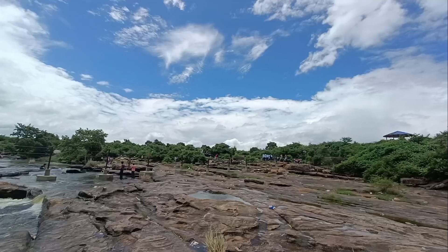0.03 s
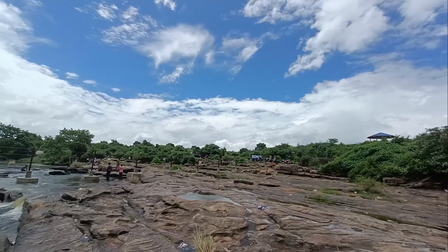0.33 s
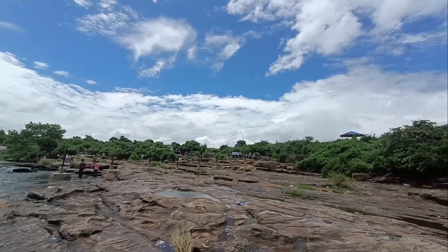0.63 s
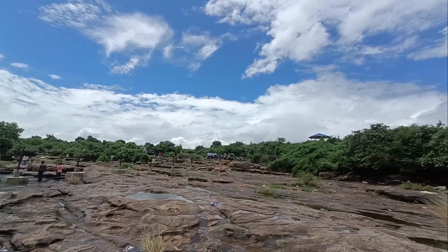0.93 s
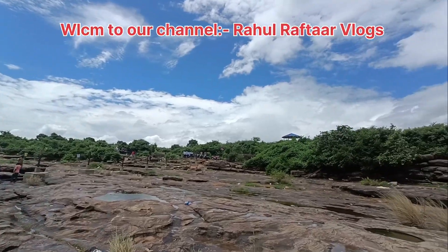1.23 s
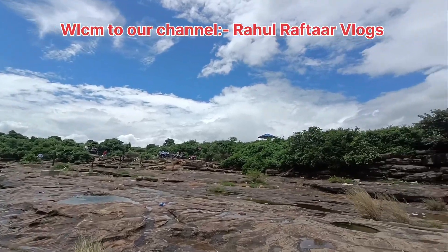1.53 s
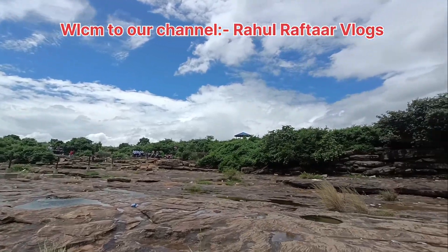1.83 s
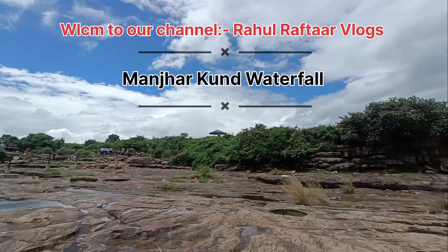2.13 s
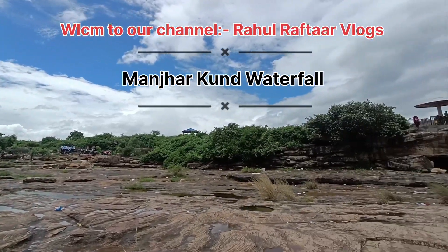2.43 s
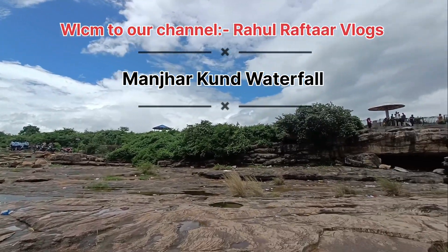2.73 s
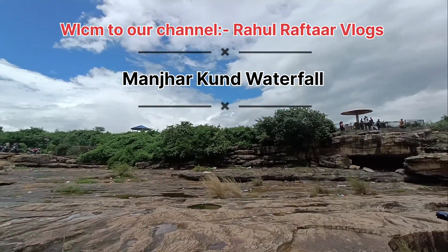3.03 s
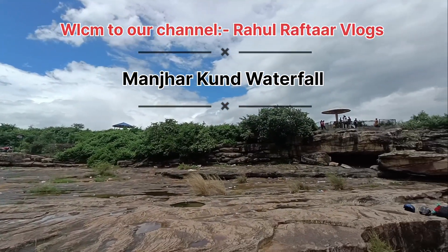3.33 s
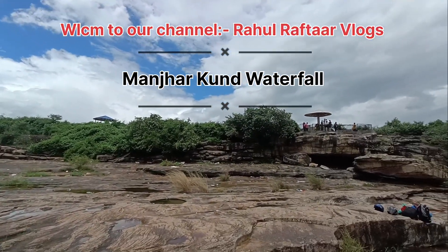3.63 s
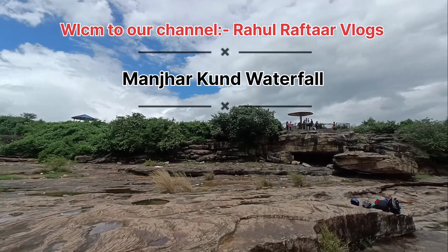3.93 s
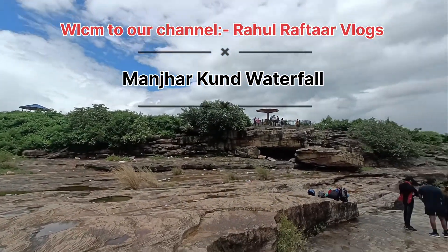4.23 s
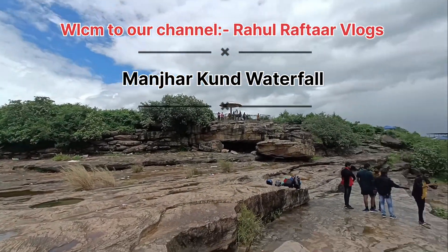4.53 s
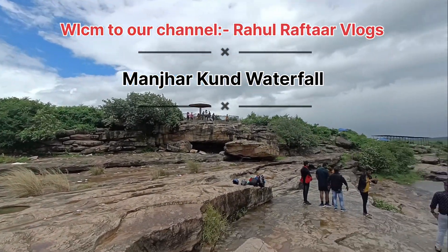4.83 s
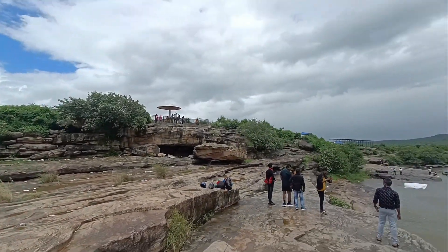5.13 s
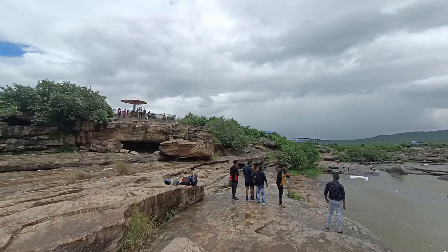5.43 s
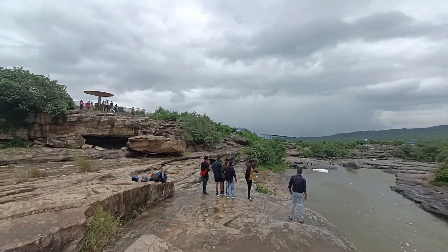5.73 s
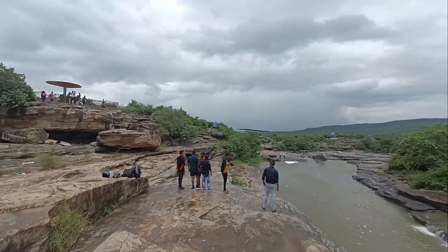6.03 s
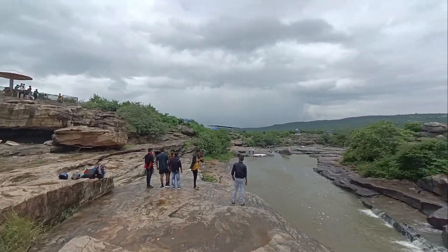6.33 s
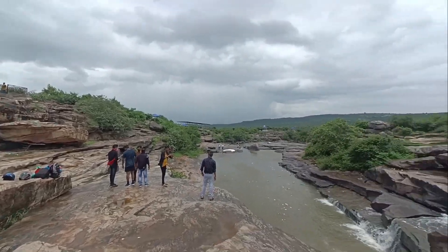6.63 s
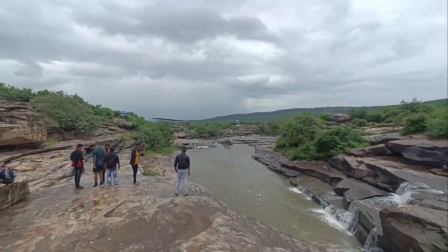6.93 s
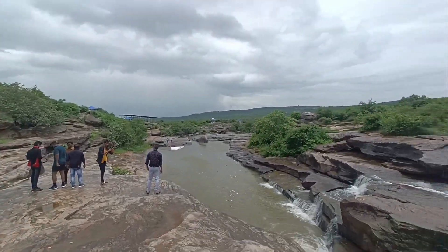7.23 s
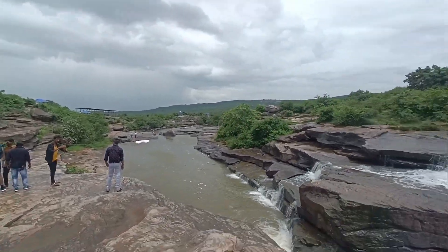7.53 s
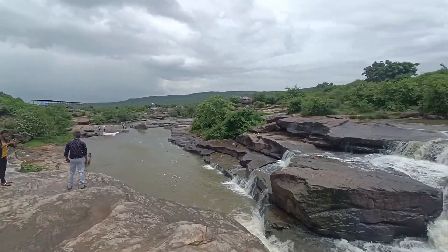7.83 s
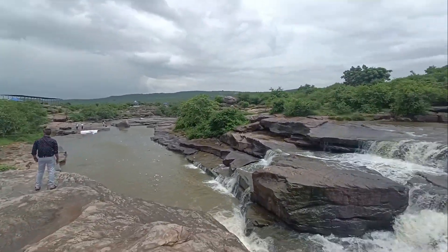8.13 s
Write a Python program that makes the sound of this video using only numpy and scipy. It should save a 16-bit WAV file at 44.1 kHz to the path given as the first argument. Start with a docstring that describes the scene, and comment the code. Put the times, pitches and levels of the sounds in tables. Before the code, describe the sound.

Wind buffets the microphone over the constant splashing rush of a waterfall, which shifts from left to right.

```python
"""A river pours over low rock ledges in open country, heard from a hand-held recorder turning on the spot.
After 0.7 s of silence the sound cuts in, with one short rising squeak on the left. The cascades, a wash
of drop impacts and bursting bubbles, start on the left while gusts rumble mostly on the right mic port.
Near 4 s the water passes behind and the wind moves to the left port; the water ends on the right.
Throughout, a limiter holds down the strongest buffets."""
import sys
import numpy as np
from scipy import signal
from scipy.fft import rfft, irfft, next_fast_len
from scipy.io import wavfile
from scipy.ndimage import uniform_filter1d, minimum_filter1d

SR = 44100
rng = np.random.default_rng(int(sys.argv[2]) if len(sys.argv) > 2 else 0)


def store_wav(level_fs):
    """Save 16-bit WAV to argv[1]."""
    pcm = np.round(np.clip(np.atleast_2d(level_fs), -1, 1) * 32767)
    wavfile.write(sys.argv[1], SR, pcm.T.astype(np.int16))


N = 366030


def from_db(db):
    """Decibels to gain."""
    return 10 ** (np.asarray(db) / 20)


def unit_rms(x):
    """Scale each channel to rms 1."""
    return x / np.sqrt(np.mean(x ** 2, axis=-1, keepdims=True) + 1e-20)


def automation(rows):
    """One curve, sample by sample, for each column after the time."""
    times, *columns = np.transpose(rows)
    return [np.interp(np.arange(N) / SR, times, column) for column in columns]


def at_hz(points, hz):
    """Read an EQ curve on a log-frequency axis."""
    knots, values = np.transpose(points)
    return np.interp(np.log(hz + 1e-6), np.log(knots), values)


def eq(x, gain_at):
    """Filter by a gain that is a function of frequency."""
    size = next_fast_len(N + SR // 10)
    hz = np.arange(size // 2 + 1) * SR / size
    return irfft(rfft(x, size) * gain_at(hz), size)[..., :N]


def drift(rate_hz):
    """Smooth random modulation of rms 1, moving at up to about the given rate."""
    return unit_rms(eq(rng.standard_normal(N), lambda hz: 1 / (1 + (hz / rate_hz) ** 2)))


def squeak(waver):
    """A rough tone that slides upwards in an instant."""
    # pitch and level of the slide: t/s, f/Hz, level/dB
    slide = [(.731, 693, -28), (.739, 750, -5), (.748, 1240, -17), (.760, 1280, -14), (.772, 1500, -22),
             (.782, 1550, -48)]
    hz, level_db = automation(slide)
    phase = 2 * np.pi * np.cumsum(hz * (1 + waver * drift(rate_hz=460))) / SR
    t = np.arange(N) / SR
    gate = (t > slide[0][0]) * (t < slide[-1][0])
    return from_db(level_db) * np.sin(phase) * gate


def airflow(port, breeze, restless_db):
    """Rumble and flutter envelopes at one port: a restless breeze, and gusts that rise, hold and fall."""
    # the strongest gusts: middle t/s, length/s, port, rumble level/dB, flutter level/dB
    gusts = [(0.713, .07, "left", -10, -36), (0.734, .07, "right", -18, -34),
             (.96, 0.13, "left", -14.5, -21), (1.32, .1, "left", -20, -22), (1.5, .1, "right", -12, -18.5),
             (1.53, 0.15, "left", -11, -20), (1.88, 0.1, "left", -20, -17),
             (1.99, 0.066, "right", -11.5, -17), (2.002, 0.069, "left", -13, -29),
             (2.107, 0.048, "right", -8, -14), (2.895, 0.22, "right", -11.5, -12),
             (3.11, 0.087, "right", -8.5, -16), (3.524, 0.08, "left", -12.5, -22),
             (3.81, 0.12, "left", -11.5, -12.5), (4.035, .16, "left", -12, -23),
             (4.19, 0.049, "left", -11, -21), (4.798, 0.05, "left", -9, -21),
             (5.475, 0.073, "left", -13.5, -13.5), (5.635, .06, "left", -14, -13),
             (6.32, 0.073, "left", -19, -17), (6.545, 0.047, "left", -19, -10.5),
             (6.865, 0.096, "left", -21, -12), (7.315, 0.12, "left", -13.5, -13.5),
             (7.44, .1, "left", -15, -12.5), (7.745, 0.19, "left", -26, -15),
             (8.06, 0.1, "left", -15, -14.5), (8.22, 0.14, "left", -16, -17)]
    fade_s = 0.035
    t = np.arange(N) / SR
    power = from_db(np.array(automation(breeze)) + restless_db * drift(rate_hz=3.7)) ** 2
    for middle, length, side, rumble_db, flutter_db in gusts:
        if side == port:
            shape = np.clip(.5 + (length / 2 - np.abs(t - middle)) / fade_s, 0, 1)
            power += from_db([[rumble_db], [flutter_db]]) ** 2 * shape
    return np.sqrt(power)


def buffets(port):
    """Brief bell-shaped swells of pressure as single large eddies hit one port."""
    # hard hits of air: peak t/s, port, level/dB
    hits = [(.887, "left", -15), (.978, "left", -5.5), (1.312, "right", -9), (1.481, "left", -9),
            (1.69, "left", -12), (2.0, "left", -7), (2.121, "left", -8), (3.092, "left", -10),
            (3.393, "left", -7.5), (4.188, "left", -4.5), (4.309, "left", -8), (4.814, "left", -12),
            (5.165, "left", -11), (5.469, "left", -4.5), (5.796, "left", -10), (7.261, "left", -8)]
    width_s = 0.015
    t = np.arange(N) / SR
    swell = np.zeros(N)
    for peak, side, level_db in hits:
        if side == port:
            near = slice(max(int((peak - 4 * width_s) * SR), 0), int((peak + 4 * width_s) * SR))
            swell[near] += from_db(level_db) * np.exp(-.5 * ((t[near] - peak) / width_s) ** 2)
    return swell


def eddies(spectrum, lumps_db, speed):
    """Eddies sweep past the port at the air's speed; their pressure comes in lumps."""
    pattern = eq(rng.standard_normal(N), lambda hz: from_db(at_hz(spectrum, hz)))
    pressure = np.interp(np.cumsum(speed) % N, np.arange(N), pattern) * from_db(lumps_db)
    # level out the slow swings and keep the quick lumps
    return pressure / np.sqrt(uniform_filter1d(pressure ** 2, size=SR // 14) + 1e-20)


def port_wind(envelopes, buffet, rumble_lump_db, flutter_lump_db, buffet_flutter_db):
    """Turbulence at one port: large eddies rumble, small ones flutter with them, buffets thump."""
    # tone of the large eddies: f/Hz, relative level/dB
    rumble_eq = [(12, -5), (28, -16), (48, -0.5), (80, 2), (140, -1.5), (210, -7.5), (300, -17), (520, -28),
                 (1200, -56)]
    # tone of the small eddies at air speed 1: f/Hz, relative level/dB
    flutter_eq = [(80, -25), (170, -2), (270, -0.5), (400, -3), (600, -9), (850, -21), (1200, -40),
                  (3000, -42)]
    # faster air pitches up the flutter and the thumps: t/s, relative speed
    air_speed = [(.7, 0.86), (4.8, .92), (6.2, 1.07), (7.1, 1.176), (7.7, 1.55), (8.3, 1.1)]
    rumble_gain, flutter_gain = envelopes
    speed, = automation(air_speed)
    lumps = drift(rate_hz=30)
    rumble = rumble_gain * eddies(rumble_eq, rumble_lump_db * lumps, np.ones(N))
    flutter_gain = np.hypot(flutter_gain, from_db(buffet_flutter_db) * buffet * speed ** 2)
    flutter = flutter_gain * eddies(flutter_eq, flutter_lump_db * lumps, speed)
    # a buffet pushes and pulls on the port for a few uneven cycles
    thump_hz = 84.8 * speed * np.exp(.45 * drift(rate_hz=60.4))
    thumps = buffet * np.sin(2 * np.pi * np.cumsum(thump_hz) / SR)
    return rumble + flutter + thumps


def splashes(per_s, spread_db, bed_db, surge_db):
    """Drop impacts and bursting bubbles of uneven size over a noise bed, surging as the water tumbles."""
    sizes = from_db(spread_db * np.minimum(rng.exponential(1, N), 4))
    polarity = rng.choice([-1, 1], N)
    drops = unit_rms(sizes * polarity * (rng.random(N) < per_s / SR))
    bed = from_db(bed_db) * rng.standard_normal(N)
    surge = from_db(surge_db * drift(rate_hz=17.0))
    return unit_rms((drops + bed) * surge)


def cascades():
    """Direct sound of the falls: each reaches the nearer port first, and the lag follows the turn."""
    # direction of the falls: t/s, angle/degrees clockwise from straight ahead
    turn = [(.7, -65), (1.7, -118), (2.7, -150), (3.5, -174), (4.3, -186), (5.0, -222), (6.2, -258),
            (7.0, -275), (8.3, -295)]
    # cascades across the river: angle/degrees off that direction, relative level/dB
    ledges = [(-44, -4), (-19, 0), (4, -8), (32.5, 0.5)]
    # direct sound that the holder's body lets past: t/s, share of power/0-1
    open_view = [(.7, 0.7), (1.4, 0.52), (2.2, .54), (3.5, .68), (4.6, 0.8), (5.6, 0.88), (7.0, 0.94),
                 (8.3, .89)]
    port_spacing_m, sound_m_per_s = .12, 343
    bearing, = automation(turn)
    ports, clock = np.zeros((2, N)), np.arange(N)
    for offset, level_db in ledges:
        fall = from_db(level_db) * splashes(per_s=5000, spread_db=3.5, bed_db=1.5, surge_db=1.65)
        lag = port_spacing_m / sound_m_per_s * SR * np.sin(np.radians(bearing + offset))
        ports += [np.interp(clock - lag / 2, clock, fall), np.interp(clock + lag / 2, clock, fall)]
    # the rest bends round the holder and arrives uncorrelated at the two ports
    clear = np.clip(automation(open_view)[0], 0, 1)
    return np.sqrt(clear) * unit_rms(ports) + np.sqrt(1 - clear) * rng.standard_normal((2, N))


def port_water(direct, colour, band_levels):
    """Direct and rock-scattered water, coloured by one port's duct and shaded by the recorder's body."""
    # water sound that arrives without scattering: f/Hz, share of power/0-1
    direct_share = [(100, 0.99), (500, 0.93), (1400, 0.89), (2400, 0.66), (4000, 0.38), (8000, .2),
                    (15000, 0.2)]
    roar_hz, rush_hz, hiss_hz, spray_hz = 1500, 2870, 6650, 11700   # edges of the two crossovers
    scattered = splashes(per_s=9000, spread_db=2.5, bed_db=5.5, surge_db=0.9)
    share = lambda hz: np.clip(at_hz(direct_share, hz), 0, 1)
    water = eq(direct, lambda hz: np.sqrt(share(hz))) + eq(scattered, lambda hz: np.sqrt(1 - share(hz)))
    water = eq(water, lambda hz: from_db(at_hz(colour, hz)) * np.sqrt(SR / 2))
    roar = eq(water, lambda hz: at_hz([(roar_hz, 1), (rush_hz, 0)], hz))
    spray = eq(water, lambda hz: at_hz([(hiss_hz, 0), (spray_hz, 1)], hz))
    rush = water - roar - spray
    roar_db, rush_db, spray_db = automation(band_levels)
    return from_db(roar_db) * roar + from_db(rush_db) * rush + from_db(spray_db) * spray


def scene():
    """The stereo mix: water and wind at both ports, the squeak on the left."""
    # tone of the water through each port's resonant duct: f/Hz, spectral density/dB
    colour_left = [(40, -53), (150, -45), (450, -52.5), (1000, -56.5), (1400, -59.5), (1850, -60.5),
                   (2200, -58), (4300, -64.5), (5700, -63.7), (6400, -72.5), (7200, -66.5), (7700, -65.5),
                   (10000, -65.5), (12600, -67.5), (15300, -86)]
    colour_right = [(40, -54), (150, -52), (450, -52), (800, -53.5), (1300, -54.5), (1850, -52.5),
                    (2300, -50.5), (3200, -53.5), (4500, -60), (5400, -63.5), (6650, -56.5), (8050, -68),
                    (9200, -65.5), (12400, -63.5), (14400, -57.5), (15800, -62.5)]
    # the water swells and is shaded during the turn: t/s, roar gain/dB, rush gain/dB, spray gain/dB
    water_left = [(.7, -1.5, -4, -3.5), (1.35, 1, 2, 2), (2.5, 0, 2.5, 4), (3.4, -0.5, -.5, 2.5),
                  (4.15, -3, -3, -.7), (4.7, -2, -1.5, -1.4), (6.4, -.5, -1.4, -1.5), (7.2, 0, -1.4, -3.5),
                  (8.3, -0.5, -1.5, -6)]
    water_right = [(.7, -5, -.6, -6.5), (1.3, -1, 2.5, -2.7), (2.4, 1.5, 4, 1.3), (3.5, 0, 2.5, 0.5),
                   (4.4, -0.5, -0.8, -1), (5.2, -0.5, -0.8, 1.2), (6.1, -0.1, -2.3, 0.5),
                   (7.1, -1.5, -4, -2.2), (8.3, -2.1, -3, -4.5)]
    # the breeze between gusts: t/s, rumble level/dB, flutter level/dB
    breeze_left = [(.7, -17, -41), (1.15, -21, -38), (1.6, -19, -29), (2.4, -21, -24), (3.2, -22, -25),
                   (3.9, -14, -22), (4.6, -18, -23.5), (6.1, -20, -16), (8.3, -17.5, -21.5)]
    breeze_right = [(.7, -23, -35), (1.15, -25, -32), (1.3, -14.5, -26), (2.3, -15.5, -26),
                    (3.05, -13, -23), (3.55, -25.5, -31.5), (5.6, -32, -27), (8.3, -20.5, -28.5)]
    direct = cascades()
    left = port_water(direct[0], colour_left, water_left) + squeak(waver=0.169)
    right = port_water(direct[1], colour_right, water_right)
    left += port_wind(airflow("left", breeze_left, restless_db=1.16), buffets("left"),
                      rumble_lump_db=2.5, flutter_lump_db=5.5, buffet_flutter_db=-5.5)
    right += port_wind(airflow("right", breeze_right, restless_db=1.5), buffets("right"),
                       rumble_lump_db=2.5, flutter_lump_db=2.5, buffet_flutter_db=-8)
    return np.array([left, right])


def limiter(x, ceiling, release_db_per_s):
    """Each channel ducks just ahead of a peak and recovers steadily."""
    over_db = 20 * np.log10(np.maximum(np.abs(x) / ceiling, 1))
    recovery_db = release_db_per_s * np.arange(N) / SR
    cut_db = np.maximum.accumulate(over_db + recovery_db, axis=-1) - recovery_db
    gain_db = uniform_filter1d(minimum_filter1d(-cut_db, size=89), size=89)   # 2 ms look-ahead
    return x * from_db(gain_db)


def record(dry):
    """The sound cuts in hard, then runs through the limiter and a steep high cut."""
    start_s, cutoff_hz = .6945, 15750
    gate = np.arange(N) / SR >= start_s
    high_cut = signal.ellip(12, .1, 80, cutoff_hz, fs=SR, output="sos")
    return signal.sosfilt(high_cut, limiter(dry * gate, ceiling=0.97, release_db_per_s=100))


dry = scene()
out = record(dry)
store_wav(out)
```